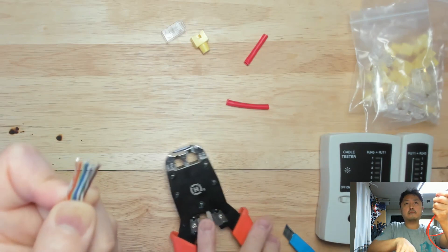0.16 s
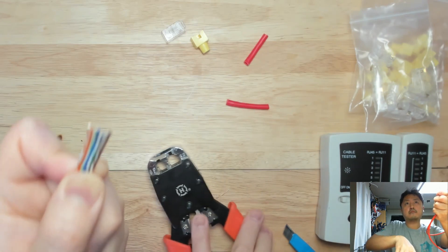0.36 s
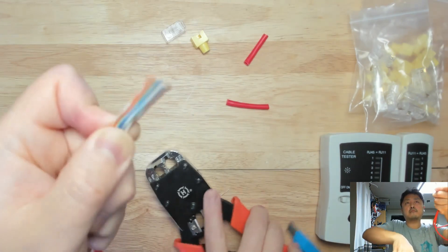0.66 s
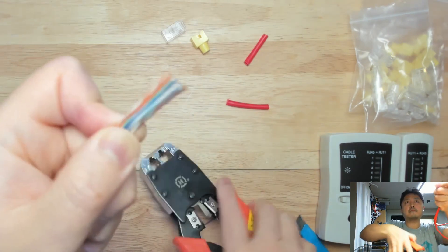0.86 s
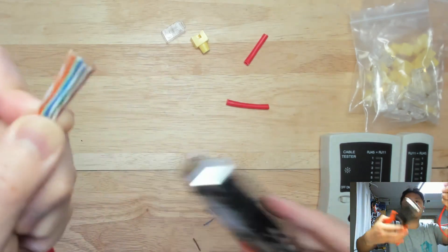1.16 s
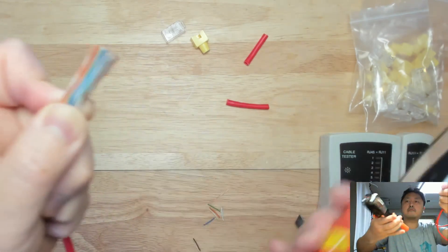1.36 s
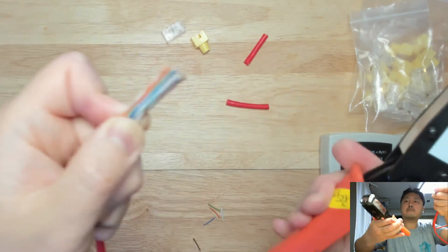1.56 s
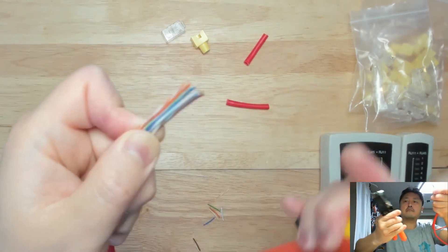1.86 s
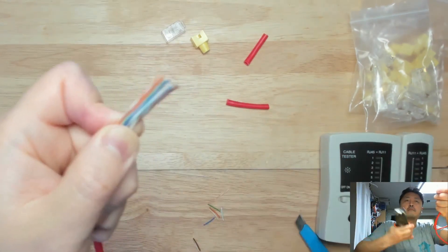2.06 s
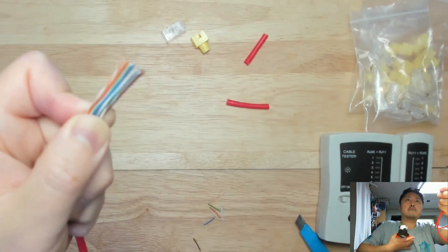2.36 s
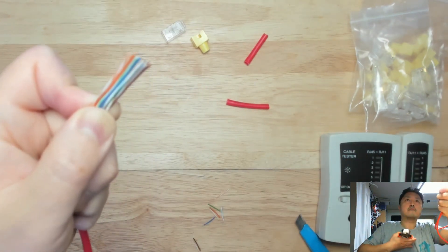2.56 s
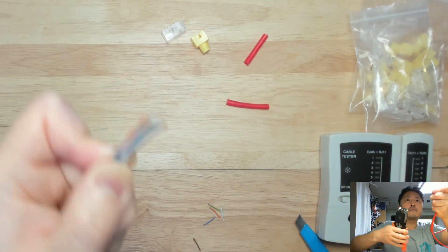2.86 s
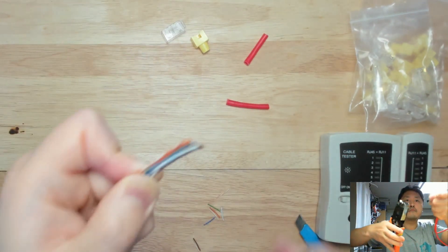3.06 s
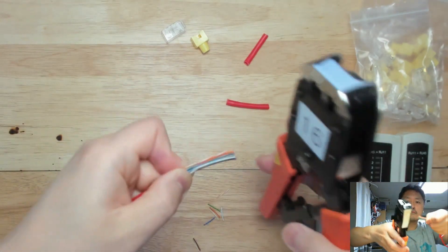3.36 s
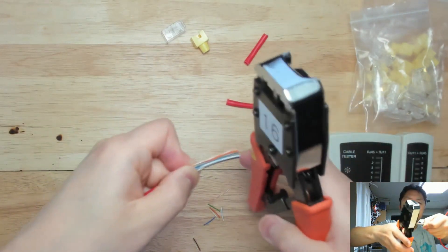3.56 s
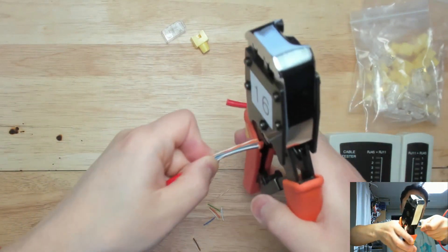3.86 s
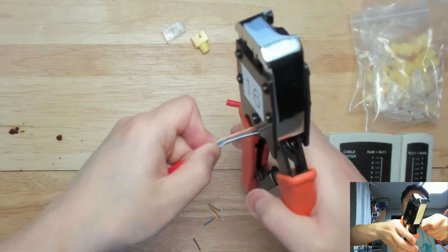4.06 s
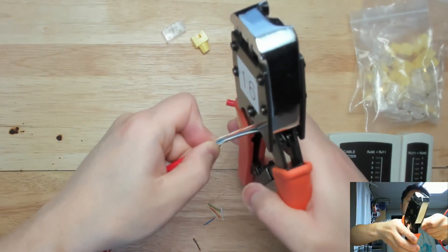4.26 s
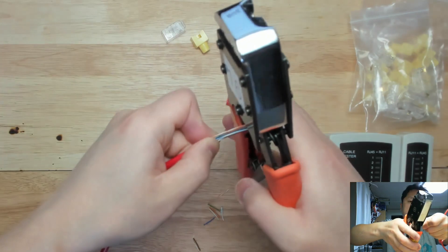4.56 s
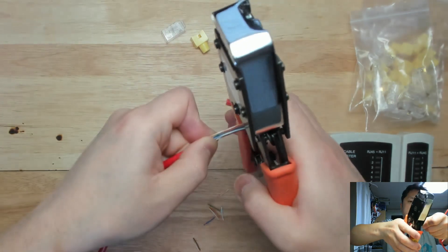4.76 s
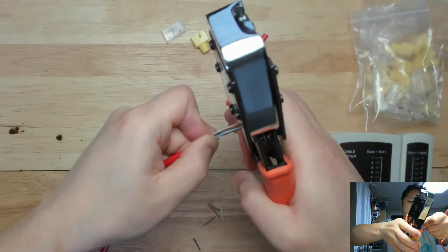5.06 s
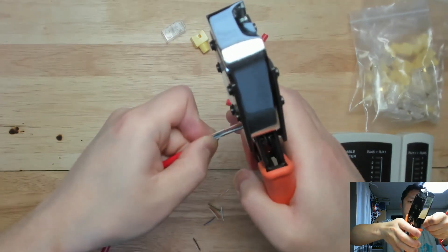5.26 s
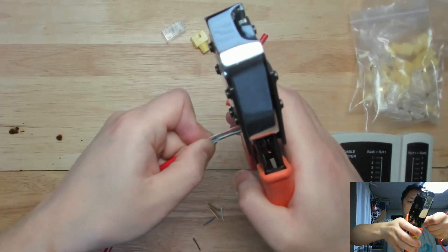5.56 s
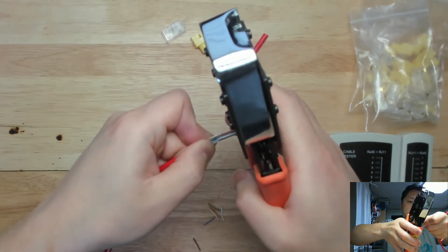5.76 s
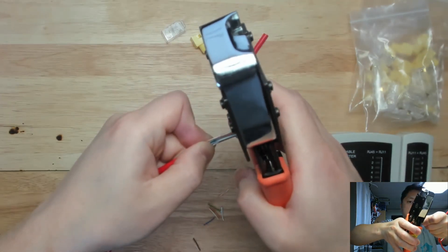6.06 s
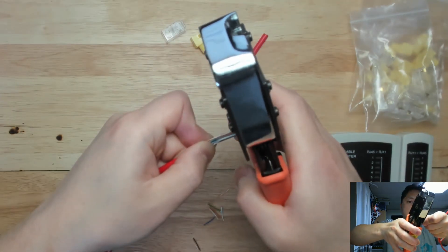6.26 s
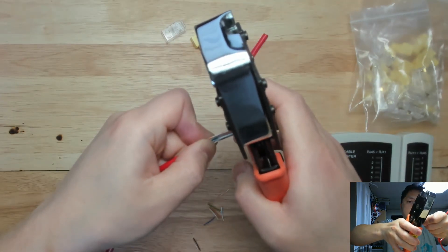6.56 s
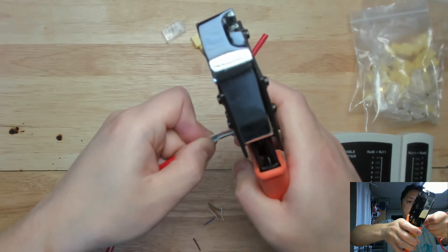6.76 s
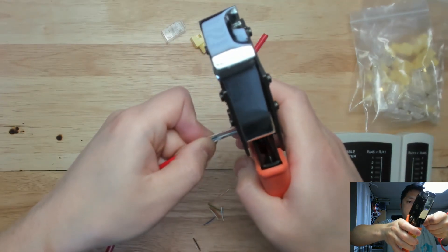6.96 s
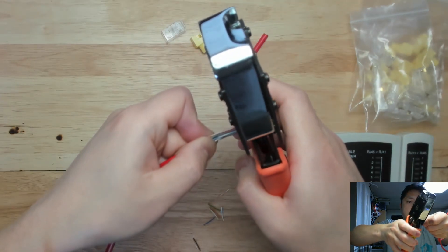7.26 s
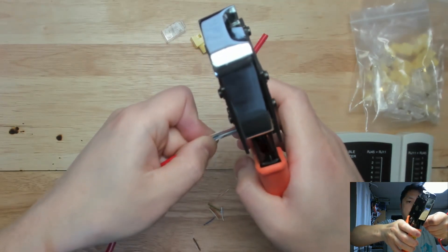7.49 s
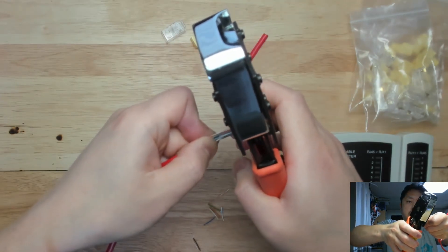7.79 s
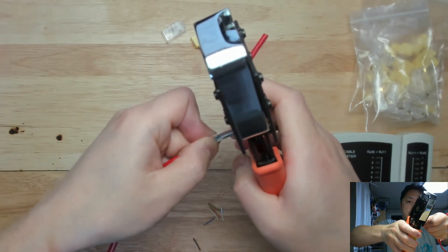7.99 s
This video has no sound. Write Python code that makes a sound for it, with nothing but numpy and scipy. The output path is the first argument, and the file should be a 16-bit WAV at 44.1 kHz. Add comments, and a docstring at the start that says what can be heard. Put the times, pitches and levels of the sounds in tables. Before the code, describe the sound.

Close metallic handling: woody drag and knocks, a harsh burst of ratchet clicks, rattling, a quiet lens motor, then spaced sharp clicks in a humming room.

```python
"""In a small room with fans humming, a steel ratchet crimping tool is dragged off a wooden table and knocks on it.
It is then squeezed through its ratchet and opened with a rattle, its return spring singing after the plucks.
A lens motor refocuses once; then the jaws close tooth by tooth on thin wires until they snip.
Noise bursts and damped modes make the steel, filtered noise the rubbing and air, and slow-wavering sines the hum.
Two close microphones roll off the treble and overload on the hardest clicks."""
import sys
import numpy as np
from scipy import signal
from scipy.fft import rfft, irfft, next_fast_len
from scipy.io import wavfile
from scipy.ndimage import uniform_filter1d

SR = 44100
rng = np.random.default_rng(int(sys.argv[2]) if len(sys.argv) > 2 else 0)


def waveform_to_disk(signal):
    """Save audio, clipped to [-1, 1], as 16-bit WAV at the path in sys.argv[1]."""
    frames = np.transpose(np.atleast_2d(signal))
    scaled = np.clip(frames, -1, 1) * 32767
    samples = np.round(scaled).astype(np.int16)
    wavfile.write(sys.argv[1], SR, samples)


N = 358533
T = np.arange(N) / SR

# fan and mains tones: (pitch [Hz], rms level [dB], waver spread [dB])
HUM_TONES = [(49.71, -42, .4), (59.47, -49.5, 1.2), (99.49, -62, 3), (120.05, -59, 1.5), (149.1, -62, 3),
             (251.9, -61.5, 1.8), (414.5, -71, 2.5), (597.5, -76, 3), (5001, -92, 2), (5652, -90, 2),
             (6998, -90, 2), (8000, -89, 1.5)]
IN_STEP_S = .212  # a moment when all the tones crest together
# spectrum of the moving air, relative: (frequency [Hz], density [dB per Hz])
AIR_COLOUR = [(44, -34.5), (75, -13.5), (103, -18.5), (208, -14), (257, -15), (332, -21), (428, -21),
              (540, -24), (900, -29.5), (1040, -35.5), (4710, -50), (7210, -42), (8190, -57), (9110, -82),
              (12000, -93), (15600, -113)]
AIR_DB = -60  # rms of the part alike at both microphones, 300 to 8000 Hz
RUMBLE_HZ, RUMBLE_DB, RUMBLE_SWING_DB = 165, -64, 3.5

# tool sliding on the table: (time [s], level of the low modes [dB], upper modes against them [dB])
DRAG_LEVELS = [(0, -44.5, -14), (0.143, -29, -10.5), (.22, -33.5, -8), (.29, -29, -14), (.34, -34, -11.5),
               (0.454, -44.5, -11), (0.602, -32.5, -7.5), (.68, -37, -1), (0.76, -43.5, -5.5),
               (0.788, -20, -22), (.81, -25, -23), (0.829, -26, -6.5), (0.853, -19.5, -20), (.866, -47, -4),
               (0.899, -76, 1)]
# modes of the table, three low ones first: (pitch [Hz], width of the first of two filters [Hz], share [dB])
TABLE_MODES = [(321, 68, -0.5), (136, 63.6, -15.5), (551, 35, -15.5), (760, 250, 11), (1085, 46, 4.5),
               (1450, 84, 3.5), (2010, 130, -0.5), (2800, 340, -6), (3001, 800, -8), (3440, 360, -13)]
DRAG_GRIT_DB = -20  # grit against the upper modes
# hand and joint rubbing on the tool: (time [s], held for [s], level [dB])
RUB_STROKES = [(1.3, 0.0085, -47.5), (1.72, 0.08, -43.5), (1.99, 0.12, -53), (2.2, 0.18, -61),
               (2.45, 0.11, -67), (2.74, 0.068, -63.5), (2.85, 0.17, -70.5)]
# spectrum of rubbed steel, relative: (frequency [Hz], density [dB per Hz])
RUB_SPECTRUM = [(410, -59.5), (700, -38), (914, -16), (996, -21.5), (1910, -8), (3550, -12), (4260, -3.5),
                (7110, -9), (9000, -32), (11700, -70.5)]
RUB_RISE_DB_S, RUB_FALL_DB_S = 343, 226.5  # dB per second

# dull taps, some of the tool on the table:
# (time [s], nominal peak of the body [dB], steel against it [dB], body pitch [Hz])
DULL_TAPS = [(0.023, -44, -10, 1370), (0.0765, -34, -28, 1500), (0.7051, -18.5, -17, 1700),
             (0.7544, -22, -20, 2220), (0.776, -32, -24, 1690), (0.846, -34.5, -24, 1900),
             (3.1876, -27.5, -14, 2220), (4.3764, -44.5, -12, 2700), (4.408, -57, -5, 2900),
             (4.499, -43, -23, 1440), (4.971, -47.5, -5.5, 2200), (5.022, -48.5, -7.5, 2000),
             (5.09, -45, -1, 1880), (5.1, -46.5, -5.5, 1500), (5.9633, -40.5, -0.5, 1980)]
# sharp steel clicks and ticks, ratchet teeth among them: (time [s], nominal peak [dB], favoured pitch [Hz])
STEEL_CLICKS = [(0.485, -44, 3500), (0.5357, -37, 4100), (0.564, -42, 4170), (0.606, -14, 2460),
                (0.612, -17, 4480), (0.627, -19.5, 3150), (0.728, -37, 4480), (0.9964, -47, 3900),
                (1.279, -28, 6400), (1.294, -15.5, 6300), (1.305, -21, 6150), (1.324, -29.5, 3950),
                (1.348, -38, 3010), (1.638, -39.5, 4130), (1.6732, -25, 5040), (1.6796, -22, 4120),
                (1.698, -26, 4340), (1.707, -28, 5230), (1.7292, -9, 4500), (1.7396, -3.5, 5900),
                (1.7576, -8.5, 5800), (1.7709, -5.5, 5050), (1.784, -8.5, 4730), (1.797, -6.5, 4440),
                (1.8116, -3.5, 4200), (1.951, -27.5, 4530), (1.9735, -24, 3750), (2.0069, -15.5, 4100),
                (2.0463, -18, 4180), (2.0877, -20.5, 4830), (2.118, -19.5, 4940), (2.155, -23.5, 4280),
                (2.232, -34, 4430), (2.2381, -26.5, 5200), (2.2947, -34.5, 4000), (2.308, -41, 3830),
                (2.547, -49.5, 4500), (2.731, -53.5, 5200), (2.783, -40, 4360), (4.542, -53.5, 3770),
                (5.168, -41, 5820), (5.229, -57, 4000), (5.2616, -28.5, 6050), (5.645, -48, 2480),
                (5.667, -42, 6720), (5.8015, -33.5, 4860), (5.88, -34.5, 5050), (5.8916, -12.5, 5320),
                (6.1787, -8.5, 5310), (6.3655, -8, 4140), (6.711, -10, 4380), (6.916, -39.5, 4980),
                (6.9324, -5, 4450), (7.888, -47, 4140)]
# modes of the steel tool: (pitch [Hz], share [dB], nominal t60 [s]; clicks use 0.45 of it)
TOOL_MODES = [(1237, -28.5, 0.068), (1483, -30.5, 0.16), (2050, -9, 0.033), (2150, -17, 0.063),
              (3450, -10.5, 0.041), (4240, -1.5, 0.06), (4710, -13.5, 0.055), (5540, -11.5, 0.042),
              (5770, -8.5, 0.13), (6255, -11, 0.1), (6700, -5.5, 0.044), (7270, -12, 0.081),
              (7550, -24, 0.18), (8215, -28.5, 0.1)]
CLICK_BODY_DB, BODY_SLOPE = -18, 0.067  # body against the steel at -25 dB; change per dB of the click
BODY_HZ, CHATTER_T60_S = 1850, .038  # chatter of a 0 dB contact; softer ones settle sooner
CLICK_RISE_S, TAP_RISE_S = 0.0035, 0.00054  # time to come within 60 dB of full push
BURST_S, SETTLE_DB = 0.0047, -3  # the parts bounce hard at first, then chatter more softly

ROOM_T60_S, ROOM_DB = 0.14, -8.5
ROOM_LOW_HZ = 2486  # soft furnishings return little below this

# the tool knocks on the table top: (time [s], level before the mode shares [dB])
TABLE_KNOCKS = [(0.542, -21.5), (0.607, -24), (.705, -30.5), (0.782, -19)]
# swings of the table top: (pitch [Hz], share [dB], t60 [s])
TABLE_TOP_MODES = [(297, 5, 0.036), (124, -6, 0.15)]
# brief single-mode pings of steel, table or spring: (time [s], starting level [dB], pitch [Hz], t60 [s])
BRIEF_PINGS = [(.611, -3.5, 3234, 0.027), (.776, -21, 1055, 0.037), (.611, -16, 4570, 0.022),
               (0.754, -27, 1940, 0.03), (0.841, -28.5, 1087, 0.091), (.845, -35.5, 1994, 0.068),
               (1.828, -18, 3060, 0.027), (3.1876, -26.5, 2340, 0.014), (5.266, -54, 7000, 0.22),
               (5.803, -44, 6060, 0.16), (5.893, -26.5, 1950, 0.032), (6.181, -28.5, 1960, 0.033),
               (6.7129, -19.5, 4030, 0.035), (2.784, -44.5, 3070, 0.019), (7.887, -48.5, 1950, 0.031)]
# lone soft thuds: (time [s], level before rise and decay [dB], pitch [Hz])
SOFT_THUDS = [(0.775, -7, 498), (2.236, -19.5, 64.4), (3.187, -36, 695), (3.363, -33, 150.6),
              (4.496, -31, 1280), (8.007, -28.5, 185.4)]
THUD_CYCLES, THUD_RISE_CYCLES = 8.3, 0.72  # swings until 60 dB down, and until within 60 dB of full rise

# plucks of the return spring: (time [s], rms level [dB], first pitch [Hz], climb [Hz per s], t60 [s])
SPRING_PLUCKS = [(1.37, -69, 4250, 0, .6), (2.16, -58, 4300, 0, .8), (5.265, -64, 4470, 50, .7),
                 (5.68, -79, 4600, 2000, .9), (5.803, -51, 4860, 550, .25), (5.895, -64, 4870, 640, 1.),
                 (6.18, -35, 4800, 530, .22), (6.367, -41, 4810, 410, .44), (6.713, -45, 4800, 1860, .38),
                 (6.935, -57, 4845, 40, 1.25)]

# low pulses as the hardest clicks overload the microphones, partly opposed left and right:
# (time [s], peak of the shared swing [dB], half-swing length [s], sign of the opposed part at the right)
OVERLOAD_PULSES = [(1.7418, -10.5, 0.00056, 1), (1.758, -8.5, 0.00053, 1), (1.7722, -6, 0.00095, -1),
                   (1.7853, -11.5, 0.00025, 1), (1.7978, -5.5, 0.00026, 1), (1.8124, -7.5, .0007, -1)]
OPPOSED_DB = -5
# the whole tool shakes while the ratchet runs free: (time [s], held for [s], level [dB])
CLATTER_STROKES = [(1.745, 0.082, -16.5)]
# spectrum of the shaken tool, relative: (frequency [Hz], density [dB per Hz])
CLATTER_SPECTRUM = [(120, -38.5), (200, -8.5), (960, -7), (2200, -1.5), (3870, -5.5), (8000, -9),
                    (9800, -2.5)]
# loose parts rattling as the handles open: (time [s], held for [s], level before ringing is added [dB])
RATTLE_STROKES = [(1.97, 0.022, -34), (2.011, 0.021, -30)]
RATTLE_RISE_DB_S, RATTLE_FALL_DB_S = 2501, 1093  # dB per second, for the clatter too
RATTLE_RING_DB = -2
# brief narrow scuffs: (start [s], length [s], pitch [Hz], filter width [Hz], level before flutter [dB])
NARROW_SCUFFS = [(2.36, .05, 5500, 3000, -63), (2.44, .09, 2420, 300, -72), (4.03, .14, 3500, 300, -71),
                 (4.07, .1, 6000, 2500, -69), (7.99, .09, 3800, 1200, -71)]

# runs of lens motor steps: (start [s], end [s], rate [steps per s], level before the barrel [dB])
MOTOR_STEPS = [(3.874, 3.886, 250, -48), (3.89, 3.898, 250, -52), (3.902, 3.974, 250, -48.5),
               (4.006, 4.018, 250, -50), (4.106, 4.22, 30, -49), (4.273, 4.42, 30, -49),
               (4.44, 4.482, 250, -49)]
# resonances of the lens barrel: (pitch [Hz], width of the first of two filters [Hz], gain [dB])
BARREL_MODES = [(1525, 300, 6.5), (3630, 2250, 11), (5700, 1500, -1.5)]
# motor whine, one row: (start [s], end [s], pitch [Hz], sine peak before panning [dB])
MOTOR_WHINE = (3.97, 4.48, 1599, -67.5)
WHINE_WIDTH_HZ = 220

# the jaws bite through and meet, two short pushes: (time [s], peak [dB], sign, length [s])
SNIP_PUSHES = [(6.9337, -9, 1, .00035), (6.9347, -4, -1, .00035)]

MIC_STOP_HZ, OVERLOAD, TOP_HZ = 9420, 0.83, 15600  # overload as a fraction of full scale
OPPOSED = np.array([[1], [-1]])  # opposite signs at the left and right microphones


def undb(db):
    """Amplitude of a level in dB."""
    return 10 ** (np.asarray(db) / 20)


def unit(x):
    """Scale to an rms of 1."""
    return x / np.sqrt(np.mean(x ** 2))


def fade(t, t60):
    """Exponential decay, 60 dB down at t60."""
    return np.exp(-np.log(1000) * t / t60)


def band(x, hz, width_hz):
    """Resonance with gain 1 at the centre."""
    return signal.lfilter(*signal.iirpeak(hz, hz / width_hz, SR), x)


def add(out, s, x):
    """Mix x in from time s."""
    i = int(s * SR)
    out[:, i:i + x.shape[-1]] += x[..., :N - i]


def walk(rate):
    """Random levels held 1 / rate s and slewed twice; spread near 1."""
    k = int(SR / rate)
    held = np.repeat(rng.standard_normal(N // k + 1), k)
    return 2.17 * uniform_filter1d(uniform_filter1d(held, k), k)[:N]


def colour(x, points):
    """Shape the spectrum of x by (frequency [Hz], level [dB]) points."""
    hz, db = np.transpose(points)
    size = next_fast_len(N)
    f = np.arange(size // 2 + 1) * SR / size + 1
    gain = undb(np.interp(np.log(f), np.log(hz), db))
    return irfft(rfft(x, size) * gain, size)[..., :N]


def curve(rows):
    """Gain over time of (time [s], level [dB]) rows, silent outside them."""
    s, db = np.transpose(rows)
    return undb(np.interp(T, s, db, -200, -200))


def strokes(rows, rise_db_s, fall_db_s):
    """Gain over time of (time [s], held for [s], level [dB]) rows: a steady rise, a hold, a steady fall."""
    gain = 0
    for s, held, db in rows:
        before, after = np.maximum(s - T, 0), np.maximum(T - s - held, 0)
        gain = gain + undb(db - rise_db_s * before - fall_db_s * after)
    return gain


def pair(size, alike):
    """Noise at two microphones with the given likeness."""
    mid, side = rng.standard_normal((2, size))
    alike = np.clip(alike, -1, 1)
    return np.sqrt(.5 + alike / 2) * mid + np.sqrt(.5 - alike / 2) * side * OPPOSED


def swing(t, db, hz, t60):
    """One damped mode, the same at both microphones."""
    return undb(db) * np.sin(2 * np.pi * hz * t)[None] * fade(t, t60)


def room_air():
    """Wavering tones over moving air and a rumble in soft bumps; bass is alike left and right, treble not."""
    tones = 0
    for hz, db, waver_db in HUM_TONES:
        level = np.sqrt(2) * undb(db + waver_db * walk(5.6))
        tones = tones + level * np.cos(2 * np.pi * hz * (T - IN_STEP_S))
    mid, side = colour(rng.standard_normal((2, N)), AIR_COLOUR)
    side = signal.sosfilt(signal.butter(1, 500, "high", fs=SR, output="sos"), side)
    heard = signal.sosfilt(signal.butter(4, [300, 8000], "band", fs=SR, output="sos"), mid)
    air = (mid + side * OPPOSED) / np.sqrt(np.mean(heard ** 2)) * undb(AIR_DB + 0.14 * walk(2.6))
    rumble = unit(band(band(rng.standard_normal(N), RUMBLE_HZ, 62), RUMBLE_HZ, 110))
    return tones + air + rumble * undb(RUMBLE_DB + RUMBLE_SWING_DB * walk(14))


def drag_gains():
    """Gain of the slide, and of the upper modes against it."""
    rows = np.array(DRAG_LEVELS)
    return curve(rows[:, :2]), curve(rows[:, [0, 2]])


def table_drag():
    """The tool sticks and slips across the table, and uneven noise drives the modes of the wood."""
    slips = pair(N, .9) * undb(2.0 * walk(150))
    modes = [undb(db) * unit(band(band(slips, hz, w), hz, 2.3 * w)) for hz, w, db in TABLE_MODES]
    slide, upper = drag_gains()
    return (unit(sum(modes[:3])) + unit(sum(modes[3:])) * upper) * slide


def steel_rub():
    """Grit under the sliding tool, then hand and joint rubbing on steel, as uneven coloured noise."""
    slide, upper = drag_gains()
    level = strokes(RUB_STROKES, RUB_RISE_DB_S, RUB_FALL_DB_S) + undb(DRAG_GRIT_DB) * upper * slide
    return unit(colour(pair(N, 1.0) * undb(2.0 * walk(300)), RUB_SPECTRUM)) * level


def opening_peak(x):
    """Scale to a nominal peak of 1, taken as 2.6 times the rms of the first moments."""
    return x / 2.6 / np.sqrt(np.mean(x[:, :SR // 150] ** 2))


def taps_and_clicks():
    """Each contact chatters briefly; it is heard directly, through the modes of the tool and as a dull body."""
    out, t = np.zeros((2, N)), T[:SR // 6]
    hz, db, t60 = (c[:, None] for c in np.transpose(TOOL_MODES))
    contacts = [(s, steel_db, mode_hz, CLICK_BODY_DB + BODY_SLOPE * (steel_db + 25), BODY_HZ, CLICK_RISE_S)
                for s, steel_db, mode_hz in STEEL_CLICKS]
    contacts += [(s, tap_db + steel, 1.5 * body_hz, -steel, body_hz, TAP_RISE_S)
                 for s, tap_db, steel, body_hz in DULL_TAPS]
    for s, peak_db, mode_hz, body_db, body_hz, rise in contacts:
        push = pair(len(t), 0.61) * (1 - fade(t, rise))
        push = push * fade(t, CHATTER_T60_S * undb(.12 * peak_db))
        push = push * undb(SETTLE_DB * np.clip(t / BURST_S - .5, 0, 1))
        # each contact point weights the modes anew, favouring those near its own pitch
        share = undb(db + 2.2 * rng.standard_normal(hz.shape))
        share = share / (1 + (np.log2(hz / mode_hz) / 0.38) ** 2)
        ring = (share * np.sin(2 * np.pi * hz * t) * fade(t, 0.45 * t60)).sum(0)
        rung = signal.fftconvolve(push, ring[None])[:, :len(t)]
        crack = band(band(push, 5200, 11000), mode_hz, 1.9 * mode_hz)
        crack = signal.lfilter(*signal.butter(2, 1400, "high", fs=SR), crack)
        narrow = band(push, mode_hz, mode_hz / 9)
        metal = undb(-5 - max(body_db + 12, 0))  # dull contacts ring less
        bright = unit(crack) + metal * unit(rung) + undb(-5.0) * unit(narrow)
        body = band(band(push, body_hz, 1.2 * body_hz), body_hz, 1.2 * body_hz)
        add(out, s, undb(peak_db) * (opening_peak(bright) + undb(body_db) * opening_peak(body)))
    return out


def room_echoes(near):
    """Dense echoes of a small furnished room, after the first wall, different at each microphone."""
    t = T[:SR // 2]
    echoes = pair(len(t), 0.14) * fade(t, ROOM_T60_S) * (t > .003)
    echoes = signal.lfilter(*signal.butter(1, ROOM_LOW_HZ, "high", fs=SR), echoes)
    echoes = echoes / np.sqrt((echoes ** 2).sum(1, keepdims=True))
    return undb(ROOM_DB) * signal.fftconvolve(near.mean(0, keepdims=True), echoes)[:, :N]


def table_knocks():
    """The struck table top gives a few damped swings."""
    out, t = np.zeros((2, N)), T[:SR // 5]
    for s, db in TABLE_KNOCKS:
        add(out, s, undb(db) * sum(swing(t, own_db, hz, t60) for hz, own_db, t60 in TABLE_TOP_MODES))
    return out


def brief_pings():
    """Each ping is one damped mode of steel, table or spring."""
    out = np.zeros((2, N))
    for s, db, hz, t60 in BRIEF_PINGS:
        add(out, s, swing(T[:SR // 5], db, hz, t60))
    return out


def soft_thuds():
    """A softened onset and a decay counted in cycles, so deep thuds last longer."""
    out, t = np.zeros((2, N)), T[:SR // 5]
    for s, db, hz in SOFT_THUDS:
        add(out, s, swing(t, db, hz, THUD_CYCLES / hz) * (1 - fade(t, THUD_RISE_CYCLES / hz)))
    return out


def return_spring():
    """A lone mode whose pitch holds or climbs with the load; the next pluck stops it."""
    out = np.zeros((2, N))
    stops = [row[0] for row in SPRING_PLUCKS[1:]] + [N / SR]
    for (s, db, from_hz, climb, t60), stop in zip(SPRING_PLUCKS, stops):
        t = T[:int((stop - s) * SR)]
        phase = 2 * np.pi * (from_hz * t + climb * t ** 2 / 2)
        edge = np.clip((stop - s - t) / .01, 0, 1)
        level = np.sqrt(2) * undb(db + walk(80)[:len(t)]) * fade(t, t60) * edge
        add(out, s, level * np.sin([phase, phase - .7]))  # the right microphone lags
    return out


def overload_pulses():
    """An overloaded microphone pair gives one short shared swing plus a pulse opposed left and right."""
    out, t = np.zeros((2, N)), T[:SR // 5]
    for s, db, length, right_sign in OVERLOAD_PULSES:
        during = t < 2 * length
        shared = -np.sin(np.pi * t / length) * during
        opposed = np.cos(1.6 * np.pi * t / length) * fade(t, 9 * length) + .3 * during
        add(out, s, undb(db) * shared - undb(OPPOSED_DB) * np.sign(right_sign) * opposed * OPPOSED)
    return out


def free_clatter():
    """The whole tool shakes: coloured noise, jumpy in level and little alike at the two microphones."""
    shaken = unit(colour(pair(N, .2) * undb(3.9 * walk(460)), CLATTER_SPECTRUM))
    return shaken * strokes(CLATTER_STROKES, RATTLE_RISE_DB_S, RATTLE_FALL_DB_S)


def loose_rattle():
    """Loose parts shake against the steel, heard as grit and through the modes of the tool."""
    shake = pair(N, 0.85) * undb(1.3 * walk(600))
    steel = sum(undb(db) * unit(band(shake, hz, 15.0 / t60)) for hz, db, t60 in TOOL_MODES)
    rattle = unit(colour(shake, RUB_SPECTRUM)) + undb(RATTLE_RING_DB) * unit(steel)
    return rattle * strokes(RATTLE_STROKES, RATTLE_RISE_DB_S, RATTLE_FALL_DB_S)


def narrow_scuffs():
    """Brief friction in one narrow band, fluttering in level and the same at both microphones."""
    out, flutter = np.zeros((2, N)), undb(3.5 * walk(60))
    for start, length, hz, w, db in NARROW_SCUFFS:
        i, size = int(start * SR), int(length * SR)
        scuff = unit(band(band(pair(size, 1.0), hz, w), hz, w))
        add(out, start, undb(db) * scuff * signal.windows.tukey(size, .5) * flutter[i:i + size])
    return out


def lens_motor():
    """Even motor steps tick in the lens barrel under a faint whine, stronger at the right microphone."""
    ticks = np.zeros(N)
    for start, end, rate, db in MOTOR_STEPS:
        at = (np.arange(start, end, 1 / rate) * SR).astype(int)
        ticks[at] = undb(db + 1.5 * rng.standard_normal(len(at)))
    # narrow filters weaken a single tick, so scale by their width
    barrel = sum(undb(db) * band(band(ticks, hz, w), hz, 2 * w) * SR / w / 8 for hz, w, db in BARREL_MODES)
    start, end, hz, db = MOTOR_WHINE
    hiss = unit(band(rng.standard_normal(N), hz, WHINE_WIDTH_HZ))
    whine = undb(db + walk(70)) * (np.sin(2 * np.pi * hz * T) + 0.96 * hiss) * (T > start) * (T < end)
    return (barrel + whine) * undb(np.array([[-2.5], [2.5]]))


def jaw_snip():
    """The jaws bite through and meet: two short rounded pushes of opposite sign."""
    out, t = np.zeros((2, N)), T[:SR // 5]
    for s, db, sign, length in SNIP_PUSHES:
        add(out, s, sign * undb(db) * np.sin(np.pi * t[None] / length) ** 2 * (t < length))
    return out


def scene():
    """The near steel and friction with their room echoes, then the sounds mixed without echoes."""
    near = table_drag() + steel_rub() + taps_and_clicks() + return_spring()
    near = near + free_clatter() + loose_rattle() + narrow_scuffs()
    blows = table_knocks() + brief_pings() + soft_thuds() + overload_pulses() + jaw_snip()
    return near + room_echoes(near) + blows + lens_motor() + room_air()


def record(dry):
    """The microphones lose the top treble, the input clips on the hardest clicks, the band ends steeply."""
    mic = signal.sosfilt(signal.cheby2(6, 36, MIC_STOP_HZ, fs=SR, output="sos"), dry)
    clipped = np.clip(mic, -OVERLOAD, OVERLOAD)
    return signal.sosfilt(signal.ellip(8, .2, 70, TOP_HZ, fs=SR, output="sos"), clipped)


dry = scene()
out = record(dry)
waveform_to_disk(out)
```